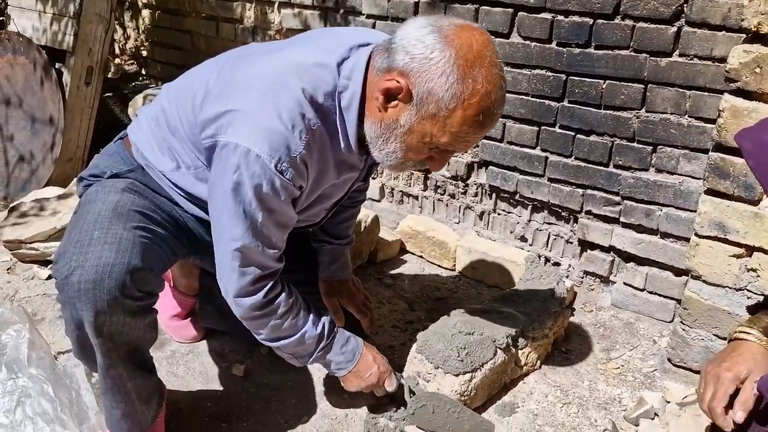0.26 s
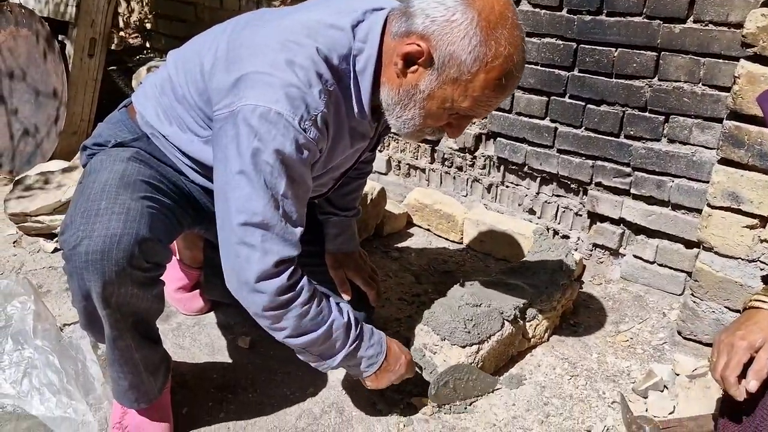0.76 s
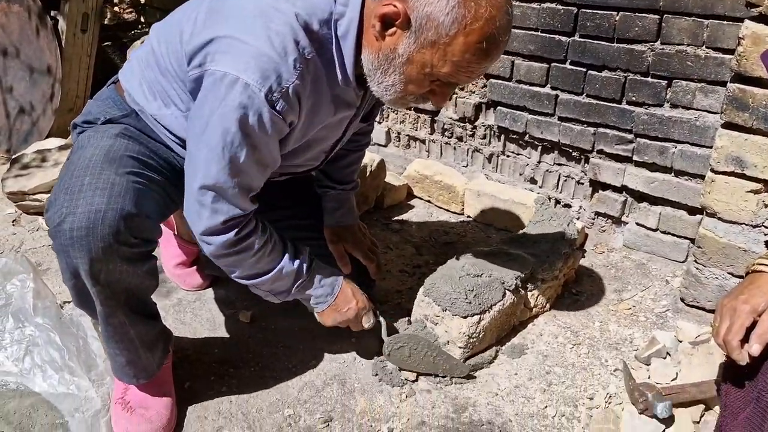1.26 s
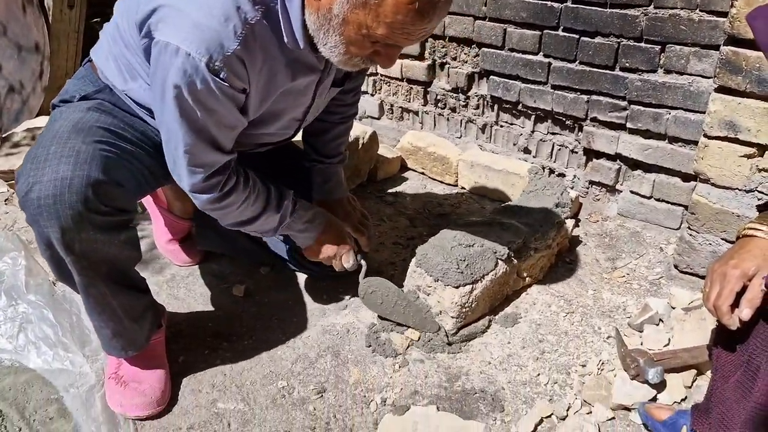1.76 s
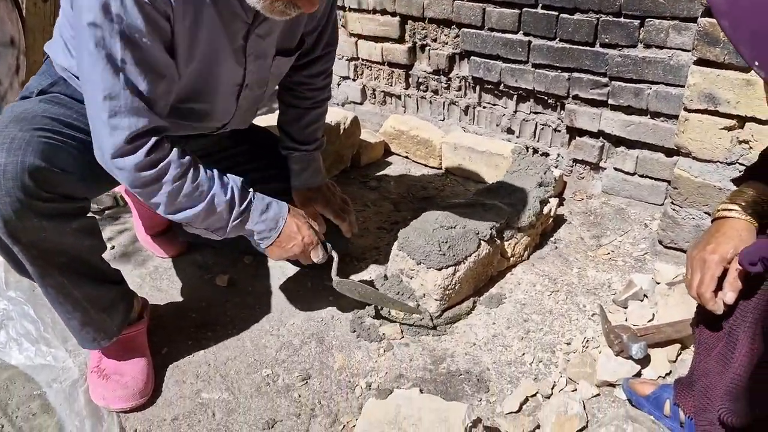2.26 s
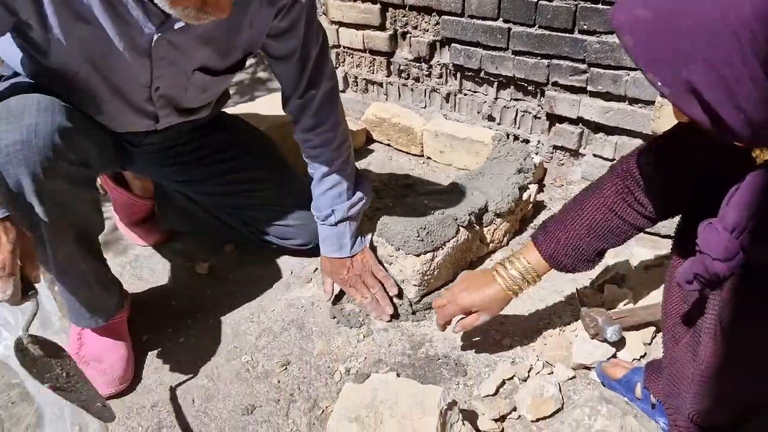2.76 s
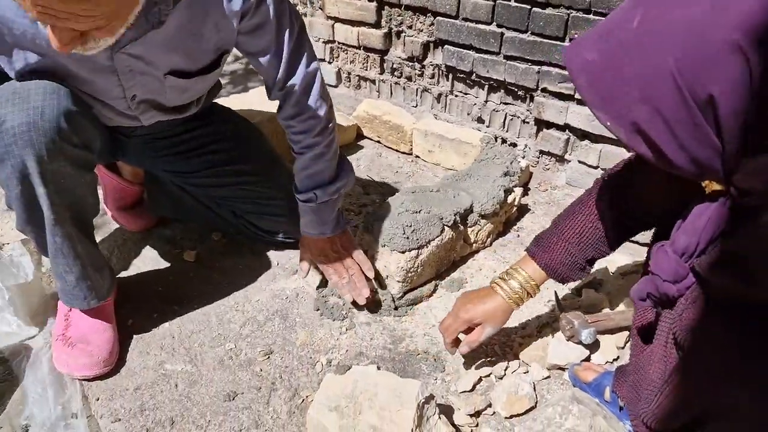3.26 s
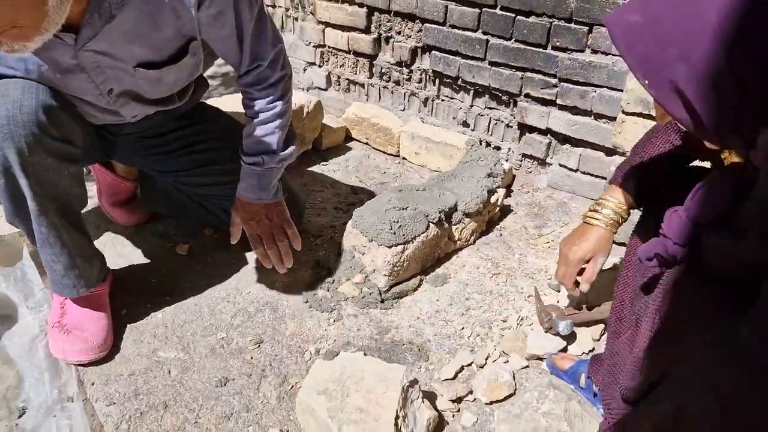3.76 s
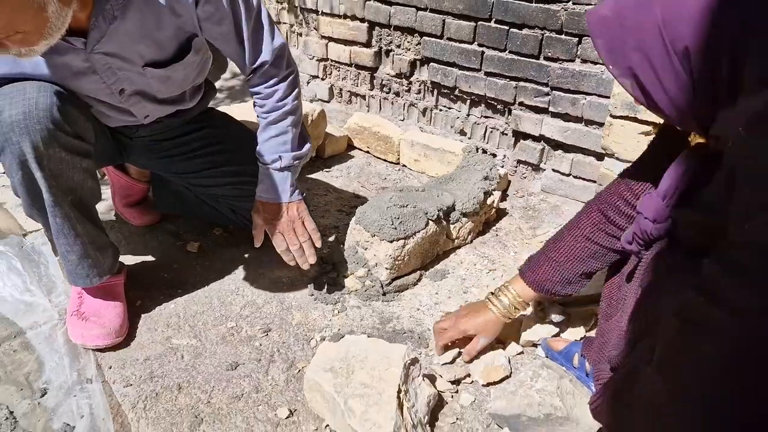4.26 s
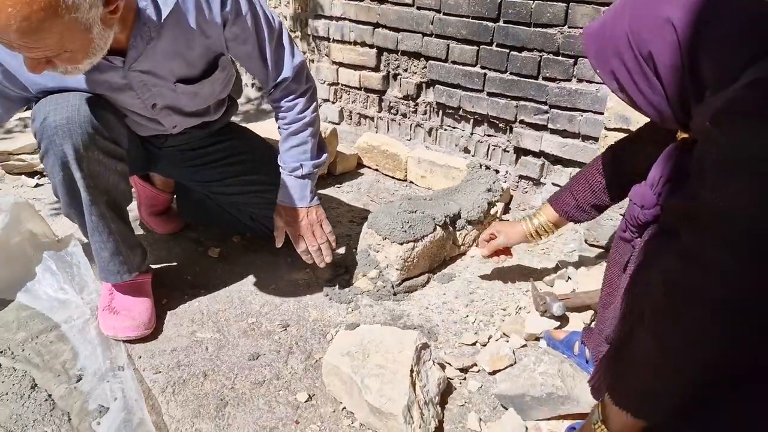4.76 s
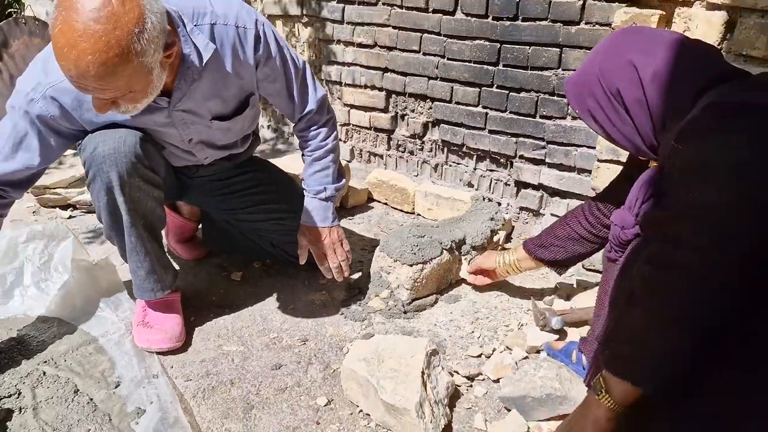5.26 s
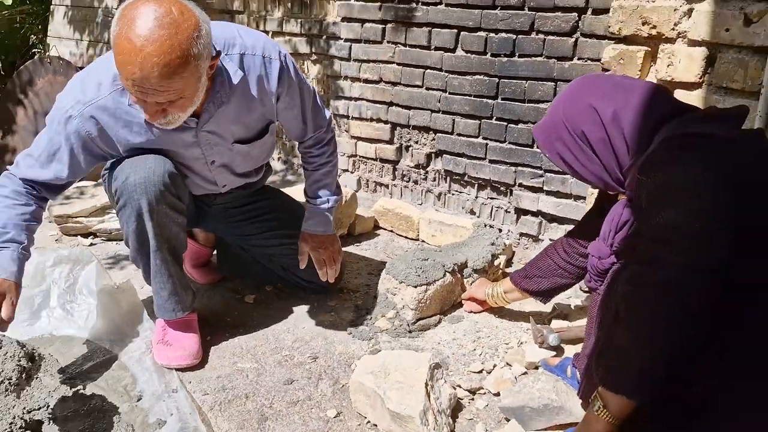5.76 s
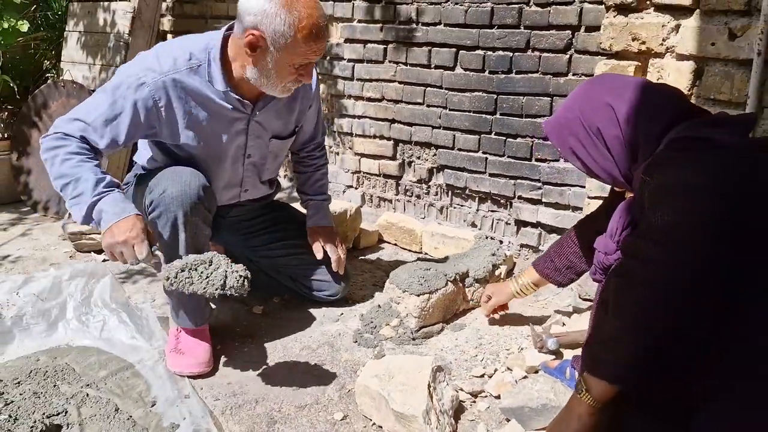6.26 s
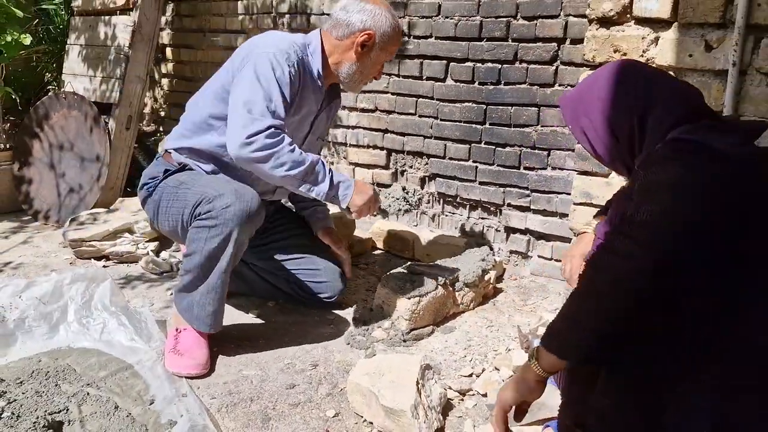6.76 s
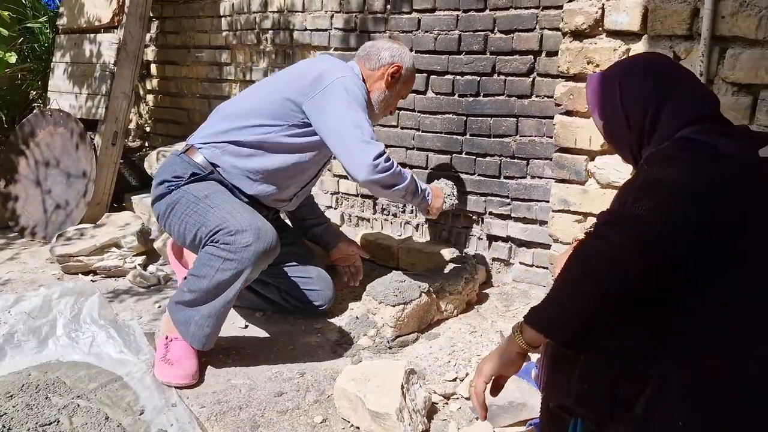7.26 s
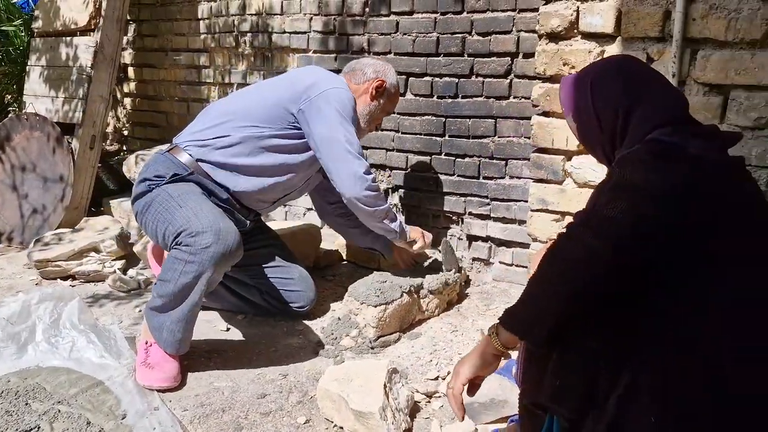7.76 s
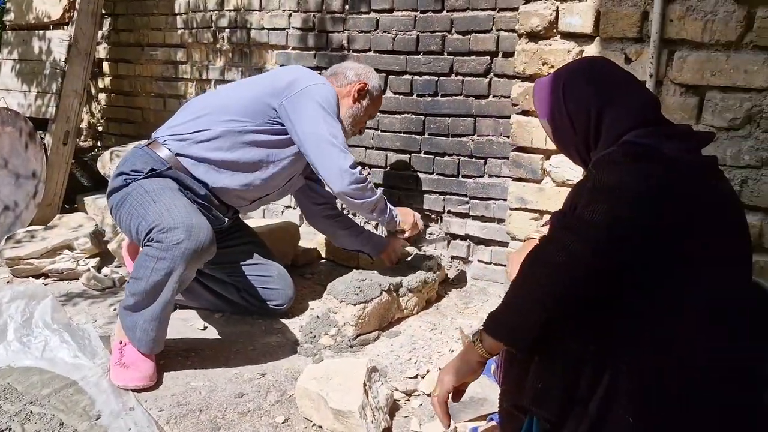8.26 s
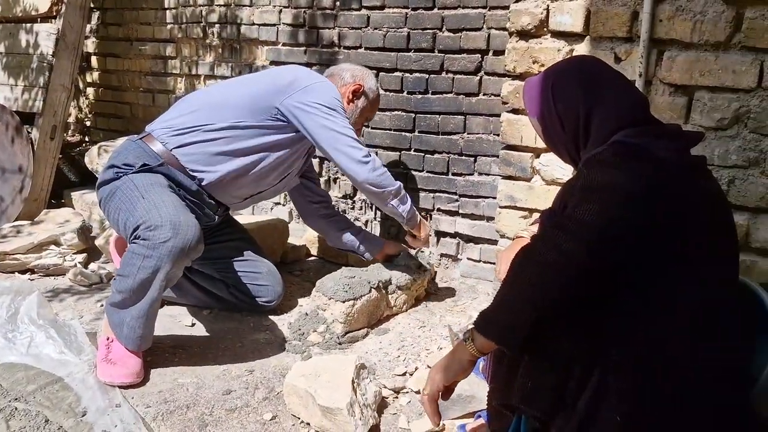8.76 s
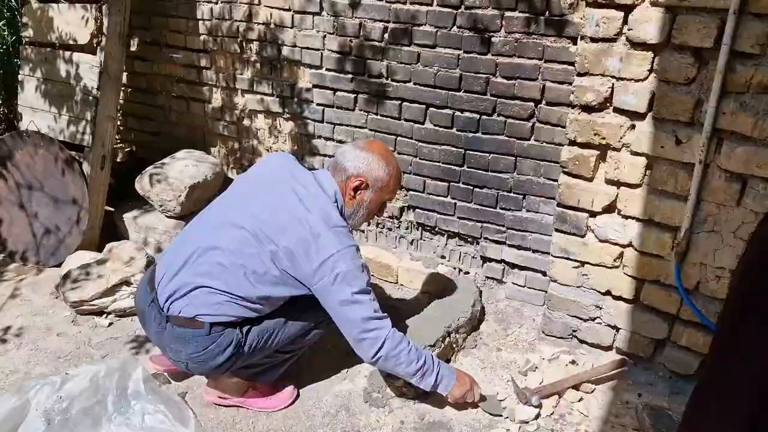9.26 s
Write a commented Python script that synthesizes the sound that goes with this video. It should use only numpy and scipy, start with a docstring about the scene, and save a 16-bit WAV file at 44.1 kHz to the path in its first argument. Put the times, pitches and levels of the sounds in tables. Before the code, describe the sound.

A mason's trowel chops rapidly into wet mortar, sandy grains ringing the metal blade, with several harder single clanks on stone. Afterwards hands pat and rub gritty ground, small stones tick and scrape, and soft thuds come irregularly. Near walls give a quick slap and very short tail. Heard close in stereo outdoors, with soft low background rumble, distant falling chirps, one dry tick close on the right, and a final rough scrape after a momentary dropout.

```python
"""A steel trowel scrapes and chops wet mortar close to the microphones, at the foot of a brick course in a yard.
Bursts of cracking sand grains ring its blade; hands and stone chips rub and click on the gritty ground.
Low thuds and short rumbles of the ground, wavering tones with crumbling grains, lie under soft blows and rubs.
Near walls answer with a slap and a short noise tail; a small bird, falling warbled tones, chirps far off.
A low background rumble of filtered noise lies under it all; near the end the level dips briefly."""
import sys
import numpy as np
from scipy import signal
from scipy.fft import rfft, irfft, next_fast_len
from scipy.io import wavfile

SR = 44100
rng = np.random.default_rng(int(sys.argv[2]) if len(sys.argv) > 2 else 0)


def store_wav(level_fs):
    """Save 16-bit WAV to argv[1]."""
    pcm = np.round(np.clip(np.atleast_2d(level_fs), -1, 1) * 32767)
    wavfile.write(sys.argv[1], SR, pcm.T.astype(np.int16))


N = 419832  # length in samples


def undb(db):
    """Decibels to gain."""
    return 10 ** (np.asarray(db) / 20)


def seconds(length):
    """Time axis of a sound, in seconds."""
    return np.arange(int(length * SR)) / SR


def level(x, db, span):
    """Scale x so that its energy per channel, spread over span seconds, has this level."""
    mean_energy = np.mean(np.sum(x ** 2, axis=-1))
    return x * undb(db) / np.sqrt(mean_energy / (span * SR))


def walk(count, rate):
    """Smooth random wander with a spread near 1, with rate turning points a second."""
    knots = rng.standard_normal(int(count * rate / SR) + 2)
    return np.interp(np.arange(count) * rate / SR, np.arange(len(knots)), knots)


def two_ears(mid, side, split_hz):
    """Left and right microphones from two unrelated signals: alike in the bass, less alike in the treble."""
    highpass = signal.butter(1, split_hz, "high", fs=SR, output="sos")
    side = .2 * side + .8 * signal.sosfilt(highpass, side)
    return np.array([mid + side, mid - side])


def body(x, spectrum, modes=(), tilt_db=0):
    """Causal filter: a broad spectrum, tilted about 2 kHz (dB per octave), with ringing resonances on top."""
    size = next_fast_len(x.shape[-1] // 2 + 4096) * 2
    f = np.maximum(np.fft.rfftfreq(size, 1 / SR), 1)
    hz, db = np.transpose(spectrum)
    broad_db = np.interp(np.log(f), np.log(hz), db)
    broad_db = broad_db + tilt_db * np.log2(np.maximum(f, 300) / 2000)
    peaks = 1 + sum(undb(2 * peak_db) / (1 + (2 * (f - centre) / width) ** 2)
                    for centre, width, peak_db in modes)
    # folding the cepstrum gives minimum phase: the response starts at once and then rings
    cepstrum = irfft(np.log(undb(broad_db) * np.sqrt(peaks)))
    cepstrum[1:size // 2] *= 2
    cepstrum[size // 2 + 1:] = 0
    return irfft(rfft(x, size) * np.exp(rfft(cepstrum)))


# Bearing of the work: t/s, head start of the left microphone/s
BEARING = [(0, 0), (1.7, .0001), (2.1, .0004), (2.7, .0001), (3.8, .00043), (5.6, .00043), (6.2, -.0001),
           (7.6, 0)]


def add(out, s, x, pan_db=0):
    """Place a sound in the stereo field at time s, the right delayed by the bearing; pan_db is left over right."""
    lead = np.interp(s, *np.transpose(BEARING))
    sides = undb(np.array([pan_db, -pan_db]) / 2)
    gains = sides / np.sqrt(np.mean(sides ** 2))
    for channel, sound, gain, at in zip(out, x, gains, (s, s + lead)):
        start = max(int(at * SR), 0)
        sound = sound[:N - start]
        channel[start:start + len(sound)] += gain * sound


# Background rumble and hiss, broad spectrum: f/Hz, relative level/dB
AIR = [(20, -30.5), (30, -12.5), (42, -1.5), (70, -7), (108, -6), (190, -10), (340, -7), (560, -20.5),
       (850, -20.5), (1200, -30), (2300, -26.5), (3200, -33), (6500, -40), (8500, -37.5), (10500, -46),
       (13000, -37), (16000, -41.5)]
# Course of the background level as heard at the microphones, before its slight wavering: t/s, level/dB
BACKGROUND_LEVEL = [(0, -63), (1, -58.5), (3, -56), (9.52, -56.5)]


def air():
    """Low background rumble under a faint hiss: filtered noise, quieter at the start and gently wavering."""
    db = np.interp(np.arange(N) / SR, *np.transpose(BACKGROUND_LEVEL)) + 0.29 * walk(N, 3.7)
    noise = two_ears(*rng.standard_normal((2, N)), 600)
    return level(body(noise, AIR)[:, :N], 0, N / SR) * undb(db)


def grit(count, rate, spread_db, width=0.9):
    """Sand grains cracking at random, rate a second: many small, a few large, scattered to both sides."""
    chance, size, sign = rng.random((count, 2, 3)).T
    cracks = chance < rate / SR
    strength = undb(-spread_db * np.log(np.maximum(size, .01)))
    mid, side = cracks * np.sign(sign - .5) * strength
    return two_ears(mid, width * side, 980)


def crunch(decay, spread_db=2):
    """A contact on grit: a burst of grains that dies away with this time constant in seconds."""
    t = seconds(8 * decay)
    onset = np.minimum(t / (0.44 * decay), 1)
    return grit(len(t), 30000, spread_db) * onset * np.exp(-t / decay)


def press(rise, length, release=0.13):
    """The pressure of one stroke: it builds, eases and dies off (all times in seconds)."""
    t = seconds(2 * length)
    building = np.minimum(t / rise, 1) ** 0.59
    easing = np.exp(-.8 * np.maximum(t - rise, 0) / length)
    return building * easing * np.exp(-np.maximum(t / length - .85, 0) / release)


def stroke(pressure, rate, spread_db, catch_db):
    """A sliding contact: grains follow the pressure, while the surface catches and slips."""
    catching = undb(catch_db * walk(len(pressure), 137.7))
    return grit(len(pressure), rate, spread_db) * pressure * catching


# Crumbling ground, broad spectrum: f/Hz, relative level/dB
GROUND = [(20, -43), (40, -21), (70, -16.5), (110, 0), (170, -5.5), (280, -2.5), (450, -11.5), (800, -19),
          (1500, -28), (8000, -61.5)]


def thud(decay, hz, crumble_db):
    """The ground rings briefly, a little unsteady in pitch, while loose stuff crumbles."""
    crumble = level(body(crunch(decay), GROUND), crumble_db, 0.92)
    t = np.arange(crumble.shape[1]) / SR
    phase = 2 * np.pi * hz * np.cumsum(1 + .05 * walk(len(t), 200)) / SR
    ring = level(np.sin(phase) * np.exp(-t / decay), 0, 1)
    return crumble + ring


# Resonances of the steel blade, before each contact varies them:
# f/Hz, width/Hz (at least 1 % of f is used), level over the broad spectrum/dB
BLADE_MODES = [(1394, 45, 10.5), (1445, 11, 12), (1894, 110, 3), (2226, 61, 6), (2575, 81, 7.5),
               (3160, 95, 6.5), (3596, 7.3, 6), (4077, 65, 10.5), (4820, 180, 4), (6340, 50, 1.5),
               (7760, 300, 5.5), (8300, 350, 3.5), (10550, 83, -3.5), (12950, 1200, 4)]


def blade_ring(drive_db=0):
    """The blade's resonances for one contact: its place weights them afresh, wet mortar loads and damps them."""
    chance = rng.standard_normal((len(BLADE_MODES), 2))
    modes = []
    for (hz, width, db), (load, place) in zip(BLADE_MODES, chance):
        driven_db = db + drive_db * (hz < 5000) + 2 * place
        modes.append((hz * (1 + .004 * load), max(width, .01 * hz), driven_db))
    return modes


# Blade striking grit and stone: t/s, level/dB, crunch time constant/s, hardness (0-1), favoured f/Hz
BLOWS = [(0.066, -22.5, 0.0049, 0.3, 4170), (0.0836, -17.5, 0.0036, 0.63, 2580),
         (0.1069, -14.5, 0.0081, .6, 1530), (0.123, -19, 0.0036, 0.31, 3200),
         (0.2347, -42.5, 0.011, 0.26, 1870), (0.4148, -21.5, 0.01, 0.23, 2520),
         (0.472, -32, 0.0087, 0.82, 1900), (0.6818, -21.5, 0.019, 0.93, 2570),
         (0.712, -29, 0.00099, 0.09, 1860), (0.952, -34.5, 0.0024, .3, 1990),
         (1.1551, -15, 0.0033, 0.74, 7700), (1.3872, -12, 0.0042, 1, 7300),
         (1.6329, -16, 0.0073, 0.76, 2000), (1.9011, -12.5, 0.0083, 1, 8660),
         (2.0482, -47, 0.0024, 0.5, 3420)]
# Trowel landing in mortar and dragging on: t/s, landing level/dB, drag length/s, drag level/dB
SCOOPS = [(0.0237, -25, 0.13, -35), (0.3863, -25, 0.055, -32), (0.6486, -24.5, 0.069, -30),
          (0.93, -24, 0.039, -32.5)]
# Blade, broad spectrum: f/Hz, relative level/dB
BLADE = [(100, -20.5), (400, -12), (800, -9), (1100, -6.5), (1500, -2.5), (2400, -3), (3600, -9),
         (6000, -7.5), (10000, -12.5), (16000, -18.5)]
# Mortar bed ringing under a dragged blade: f/Hz, width/Hz, level over the broad spectrum/dB
DRAG_MODES = [(440, 75, 8.5), (692.5, 20, 15), (810, 110, 11.5)]
LANDING_S, LANDING_HZ, LANDING_HARDNESS = .0042, 2010, 0.11  # crunch time constant, favoured f, 0-1
# (in soft mortar, on bare stone): a harder contact is brighter and moves the ground less
BLOW_TILT_DB, BLOW_THUD_DB = (-4, 1.4), (-3, -35.5)  # per octave; against the blow
# one bounce, its gain then multiplied by the hardness: delay, level against the blow, time constant
REBOUND_S, REBOUND_DB, REBOUND_DECAY_S = 0.018, -15.5, 0.0033


def trowel_blows():
    """Grit crunches ring the blade; the point of contact favours one range, and each blow thumps the ground."""
    out = np.zeros((2, N))
    landings = [(s, db, LANDING_S, LANDING_HARDNESS, LANDING_HZ) for s, db, _, _ in SCOOPS]
    for s, db, decay, hardness, hz in landings + list(BLOWS):
        tilt_db = np.interp(hardness, [0, 1], BLOW_TILT_DB)
        thud_db = np.interp(hardness, [0, 1], BLOW_THUD_DB)
        modes = blade_ring() + [(hz, 0.072 * hz, 10.5)]  # last: the favoured range
        strike = body(crunch(decay, spread_db=1.5), BLADE, modes, tilt_db)
        rebound = body(crunch(REBOUND_DECAY_S), BLADE, modes)
        add(out, s, level(strike, db, 0.0042))
        add(out, s, level(thud(0.0055, hz=284, crumble_db=4.5), db + thud_db, 0.0086))
        add(out, s + REBOUND_S, hardness * level(rebound, db + REBOUND_DB, 0.0013))
    return out


def trowel_drags(drive_db=4):
    """Sliding friction feeds the sharp resonances of the steel (below 5 kHz) more than a blow does."""
    out = np.zeros((2, N))
    for s, _, length, db in SCOOPS:
        drag = stroke(press(.65 * length, length), rate=1500, spread_db=4, catch_db=4)
        modes = blade_ring(drive_db) + DRAG_MODES
        add(out, s, level(body(drag, BLADE, modes, tilt_db=-1.5), db, length))
    return out


# The yard's answer, broad spectrum: f/Hz, relative level/dB
ECHO = [(100, -5), (500, -1), (1500, -3), (4000, -3), (8000, -7.5), (16000, 2)]


def yard(dry, echo_db=-5, t60_s=0.23, treble_t60_s=0.22, slap_db=-11):
    """Direct sound, a quick slap from the wall behind the work, then a short tail whose treble dies first."""
    t = seconds(.4)
    noise = two_ears(*rng.standard_normal((2, len(t))), 700)
    low = signal.sosfiltfilt(signal.butter(2, 3000, fs=SR, output="sos"), noise)
    fading = low * undb(-60 * t / t60_s) + (noise - low) * undb(-60 * t / treble_t60_s)
    onset = np.clip((t - .003) / 0.0034, 0, 1)
    tail = level(body(fading * onset, ECHO), echo_db, 1 / SR)
    slap_shape = np.exp(-((t - .015) / 0.011) ** 2)
    slap = level(body(noise * slap_shape, ECHO), slap_db, 1 / SR)
    return dry + signal.fftconvolve(dry, tail + slap, axes=1)[:, :N]


# Low thuds and short rumbles of the ground, under soft blows and rubs:
# t/s, level/dB, time constant/s, pitch f/Hz, crumbling roughly against the ring/dB
THUDS = [(0.389, -34, 0.065, 103, -3), (0.653, -33.5, .08, 111, -8), (1.01, -39, 0.012, 99, -5),
         (1.646, -39, 0.09, 121.5, -4), (2.11, -44, .004, 710, 0), (2.15, -47, .015, 126, -4),
         (2.761, -40, 0.052, 100, -3), (2.83, -39, 0.027, 238, 2), (4.11, -40.5, 0.033, 105.6, 3),
         (4.2, -37.5, 0.043, 100.4, 5), (4.699, -42, .12, 336, -3), (5.665, -42, 0.019, 114, -2),
         (5.726, -44, 0.013, 91, -3.5), (7.0, -41.5, 0.018, 344, -8), (7.018, -36, 0.0062, 350, -13),
         (7.626, -37.5, 0.021, 205, 11), (7.677, -38.5, 0.011, 84, -9), (7.683, -37, 0.0043, 397, 3),
         (9.18, -40.5, 0.018, 109, -8), (9.26, -41, 0.25, 116, 9)]


def ground_thuds():
    """Low thuds and short rumbles: the ground rings and crumbles under soft blows and rubs."""
    out = np.zeros((2, N))
    for s, db, decay, hz, crumble_db in THUDS:
        add(out, s, level(thud(decay, hz, crumble_db), db, .01))
    return out


# Distant chirps: start t/s
CHIRPS = [1.55, 2.49, 3.555, 5.825, 6.445, 7.285, 7.975, 8.716]


def bird(db=-74):
    """Falling, warbled chirps, smeared by their long way to the microphones."""
    out = np.zeros((2, N))
    t, tail = seconds(.14), seconds(.3)
    for s in CHIRPS:
        hz = np.interp(t, [0, t[-1]], [4500, 3200]) * (1 + .09 * walk(len(t), 300))
        chirp = np.sin(2 * np.pi * np.cumsum(hz) / SR) * np.sqrt(np.sin(np.pi * t / .14))
        smear = rng.standard_normal((2, len(tail))) * np.exp(-tail / 0.029)
        add(out, s, level(signal.fftconvolve(chirp[None], smear), db, 0.19))
    return out


# Small clicks of stone on stone: t/s, level/dB, ring f/Hz
CHIPS = [(2.1102, -34.5, 1000), (2.7145, -44, 820), (2.734, -47.5, 1050), (2.7539, -37, 2400),
         (2.831, -45.5, 1930), (2.966, -54, 4500), (3.8629, -48.5, 2220), (4.2472, -45, 1420),
         (4.313, -42.5, 900), (4.398, -46, 1100), (5.0644, -37, 2210), (5.7666, -41.5, 1000),
         (6.5975, -49, 7130), (7.0178, -39.5, 5600), (8.505, -48, 4060), (9.0727, -43, 2250),
         (9.136, -41, 2250), (9.17, -42.5, 4000)]
# Sand and small stones, broad spectrum: f/Hz, relative level/dB
SAND = [(100, 1), (350, 4.5), (600, -8), (850, -1.5), (1200, -4), (2300, -3), (3300, -9), (4800, -9),
        (6400, -14), (9000, -12), (11000, -17.5), (16000, -17.5)]


def stone_chips():
    """A tiny crunch rings each stone; smaller, higher stones click brighter."""
    out = np.zeros((2, N))
    for s, db, hz in CHIPS:
        tilt_db = np.interp(np.log(hz), np.log([800, 7000]), [-1, 1.5])
        click = body(crunch(0.0031), SAND, [(hz, 0.087 * hz, 15.5)], tilt_db)
        add(out, s, level(click, db, 0.005))
    return out


def rub(pressure, hz, peak_db, tilt_db, more_modes=(), count=3):
    """Several points of contact catch at random; each shares the main resonance and rings a stone of its own."""
    out = 0
    width = 0.4 * hz * undb(-.7 * peak_db)  # a stronger resonance is also narrower
    for octaves in rng.uniform(0, 2.795, count):
        stone_hz = 1200 * 2 ** octaves
        grains = stroke(pressure, rate=2200, spread_db=4, catch_db=3.5)
        modes = [(hz, width, peak_db), (stone_hz, 0.041 * stone_hz, 7), *more_modes]
        out = out + body(grains, SAND, modes, tilt_db)
    return out


# Brief rubs of hands and mortar over grit: t/s, length/s, level/dB
RUBS = [(2.286, 0.16, -64), (2.735, 0.17, -53), (3.057, .046, -61.5), (5.259, 0.45, -60.5),
        (5.68, 0.1, -58.5), (6.802, .12, -56), (7.204, 0.026, -58.5), (7.604, 0.049, -41.5),
        (7.631, 0.25, -59), (8.503, .33, -60)]


def hand_rubs():
    """Hands and mortar slide over grit, each stroke building quickly and easing off."""
    out = np.zeros((2, N))
    for s, length, db in RUBS:
        sound = rub(press(0.22 * length, length), hz=4850, peak_db=-2, tilt_db=2.7)
        add(out, s, level(sound, db, length))
    return out


# Long scrapes of a stone chip over the ground, one curve each: t/s, level before the overall gain/dB
SCRAPES = [
    [(3.8, -79), (3.832, -61.5), (3.926, -55), (3.952, -41.5), (4.002, -39), (4.028, -45.5), (4.256, -44.5),
     (4.288, -52), (4.6, -63)],
    [(4.6, -62.5), (4.708, -46), (4.736, -48.5), (4.776, -42), (4.824, -50), (4.88, -48)],
    [(4.88, -49), (5.078, -42.5), (5.178, -51), (5.184, -56.5), (5.28, -63)],
    [(8.92, -69), (9.106, -50), (9.184, -50.5), (9.21, -56)],
    [(9.255, -40), (9.263, -36.5), (9.379, -35), (9.401, -43), (9.439, -40), (9.503, -69), (9.511, -46),
     (9.52, -50)],
]
# What rings in each scrape: f/Hz, level/dB, tilt/dB per octave, second f/Hz, its level/dB
SCRAPERS = [(2000, 6, 2, 480, -8), (2170, -1, 2.35, 540, 12), (2300, 4.5, 1.64, 796, 14),
            (2280, 13.5, 0, 480, -6), (1700, 13.5, 0.7, 3250, 9)]


def scraping(gain_db=1):
    """A stone chip is pushed over the gritty ground, as loud as the hand presses."""
    out = np.zeros((2, N))
    for curve, (hz, peak_db, tilt_db, second_hz, second_db) in zip(SCRAPES, SCRAPERS):
        times, db = np.transpose(curve)
        t = times[0] + seconds(times[-1] - times[0])
        pressure = undb(np.interp(t, times, db))
        second_mode = (second_hz, 0.27 * second_hz, second_db)
        sound = rub(pressure, hz, peak_db, tilt_db, [second_mode])
        add(out, times[0], level(sound, gain_db, np.sum(pressure ** 2) / SR))
    return out


def crackle(db=-58):
    """Sparse sharp snaps crackle as a sleeve or plastic sheet is crumpled."""
    out = np.zeros((2, N))
    grains = stroke(press(.16, .3), rate=130, spread_db=4, catch_db=2)
    add(out, 5.3, level(body(grains, SAND, [(10200, 3000, 11.0)], tilt_db=7.5), db, 0.17))
    return out


def near_tick(at_s=8.1268):
    """One dry tick close to the right microphone, too near to stir the yard: a crunch and two short thuds."""
    out = np.zeros((2, N))
    tick = body(crunch(0.0012), SAND, [(960, 62, 13.6)], tilt_db=-2.0)
    add(out, at_s, level(tick, db=-37.5, span=0.0042), pan_db=-20)
    add(out, at_s, level(thud(0.0013, hz=420, crumble_db=-0.5), db=-35.5, span=0.0058), pan_db=-14)
    add(out, at_s, level(thud(0.012, hz=940, crumble_db=-12), db=-41.0, span=0.0046), pan_db=-20)
    return out


def scene():
    """The work and the bird with the yard's answer, then the close tick and the background without it."""
    trowel = trowel_blows() + trowel_drags()
    handwork = ground_thuds() + stone_chips() + hand_rubs() + scraping() + crackle()
    return yard(trowel + handwork + bird()) + near_tick() + air()


def record(dry):
    """The sound drops out for a moment near the end; the treble above 15.9 kHz is cut."""
    dropout = np.interp(np.arange(N) / SR, [9.212, 9.22, 9.253, 9.258], [1, .005, .005, 1])
    lowpass = signal.ellip(10, .2, 70, 15900, fs=SR, output="sos")
    return signal.sosfilt(lowpass, dry * dropout)


dry = scene()
out = record(dry)
store_wav(out)
```